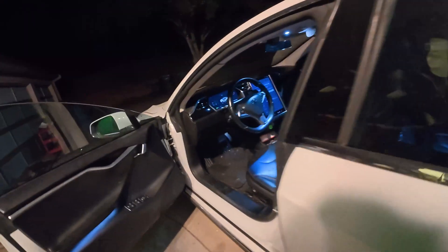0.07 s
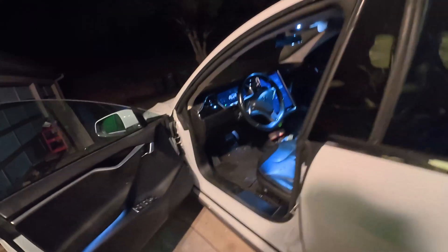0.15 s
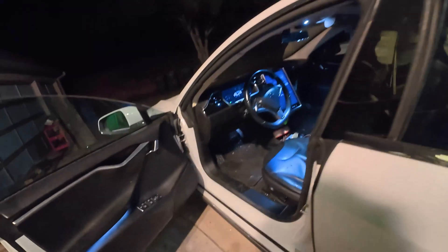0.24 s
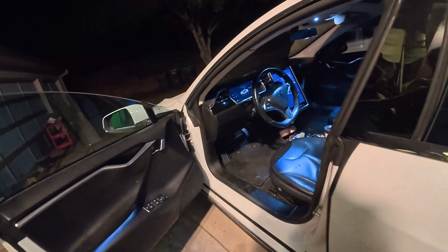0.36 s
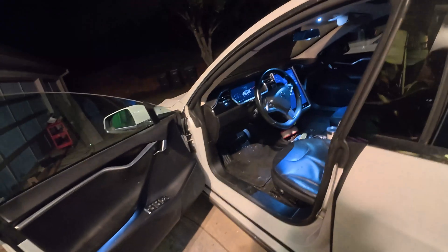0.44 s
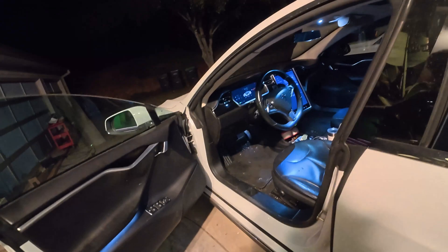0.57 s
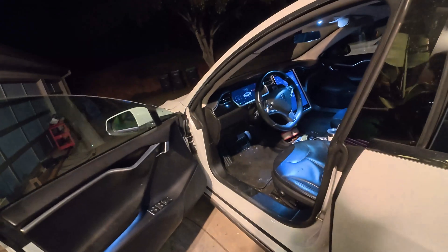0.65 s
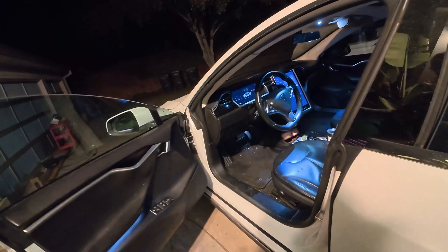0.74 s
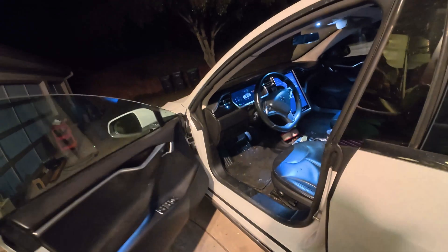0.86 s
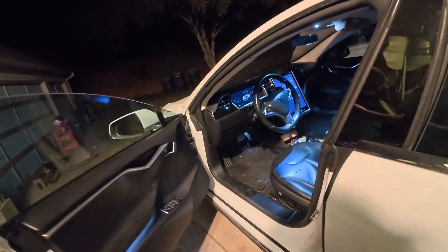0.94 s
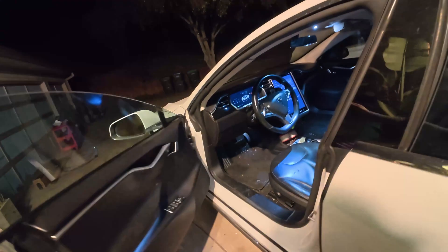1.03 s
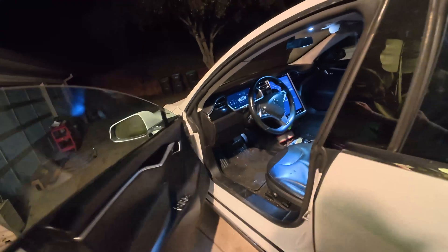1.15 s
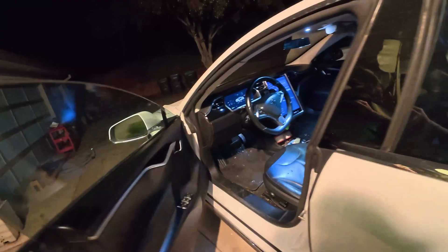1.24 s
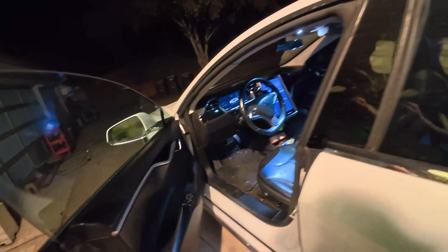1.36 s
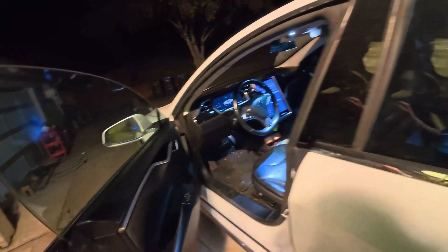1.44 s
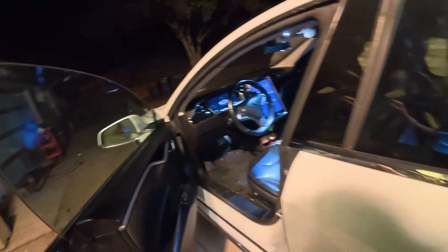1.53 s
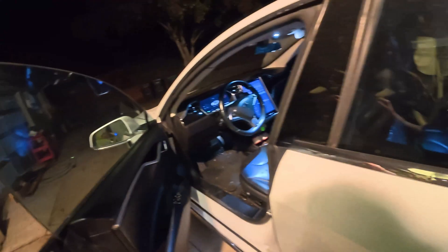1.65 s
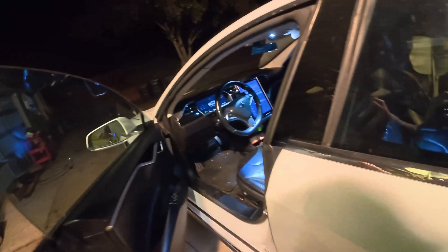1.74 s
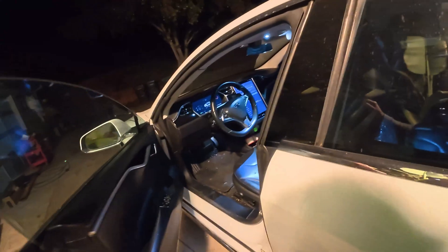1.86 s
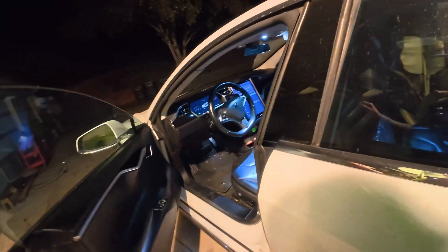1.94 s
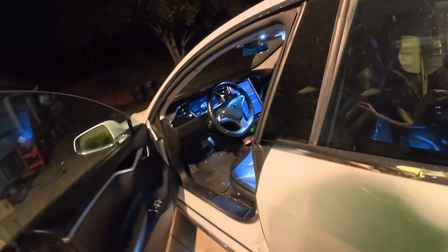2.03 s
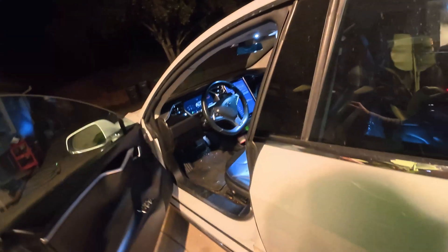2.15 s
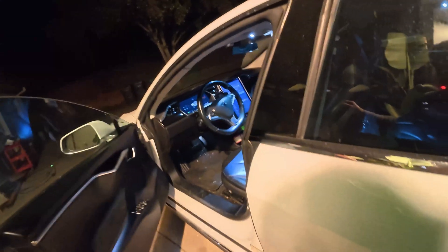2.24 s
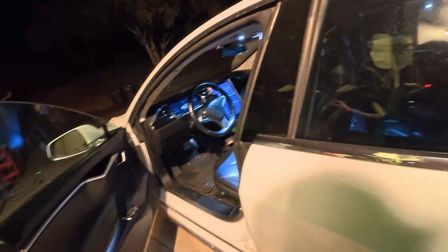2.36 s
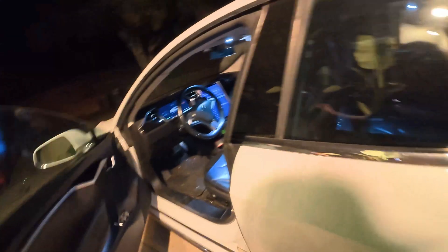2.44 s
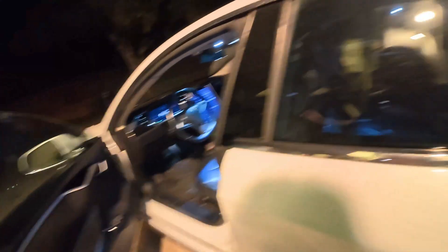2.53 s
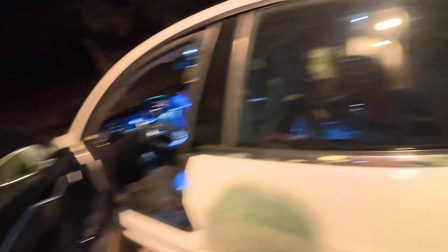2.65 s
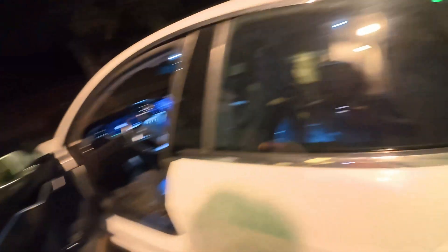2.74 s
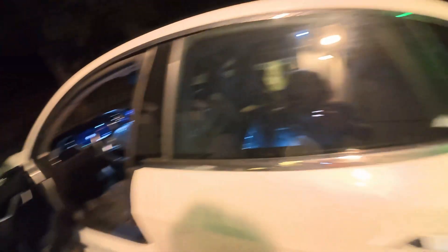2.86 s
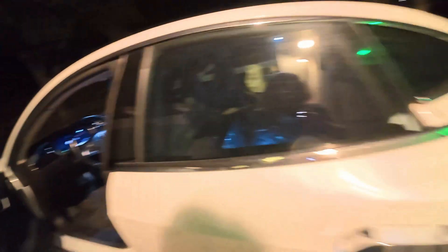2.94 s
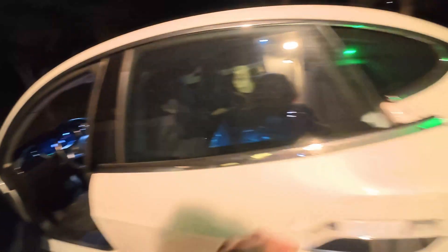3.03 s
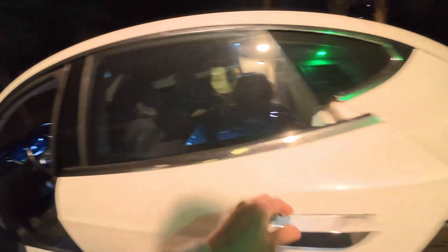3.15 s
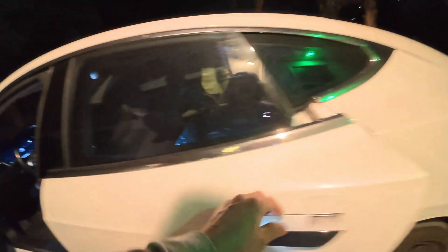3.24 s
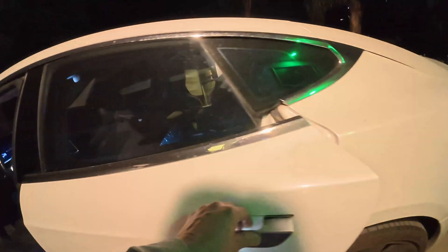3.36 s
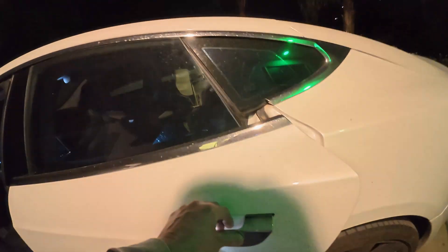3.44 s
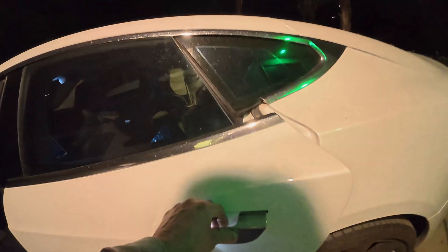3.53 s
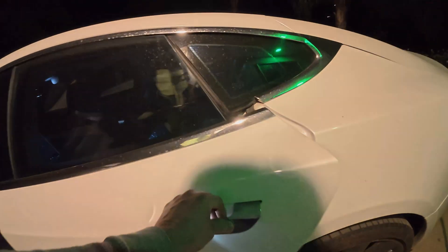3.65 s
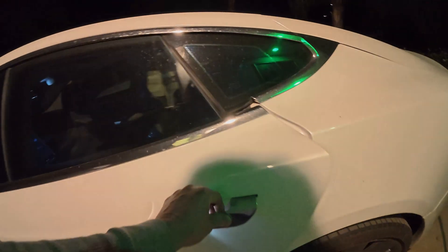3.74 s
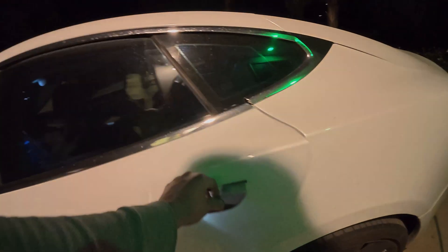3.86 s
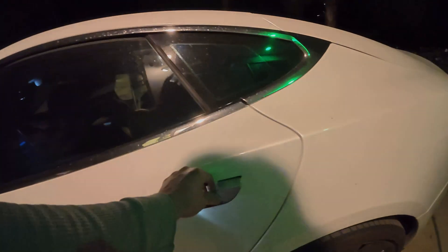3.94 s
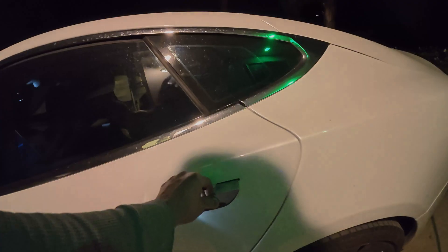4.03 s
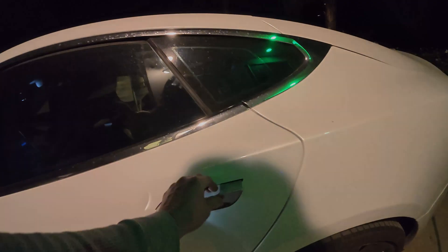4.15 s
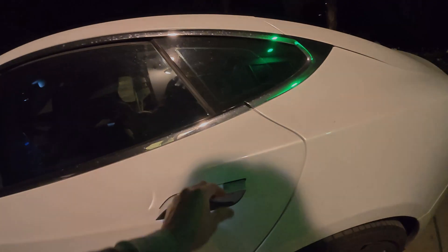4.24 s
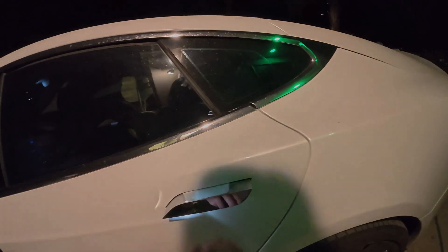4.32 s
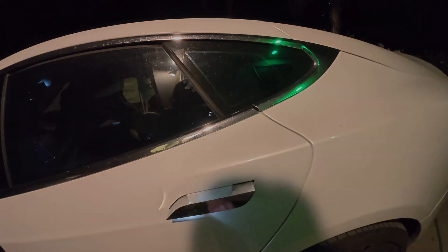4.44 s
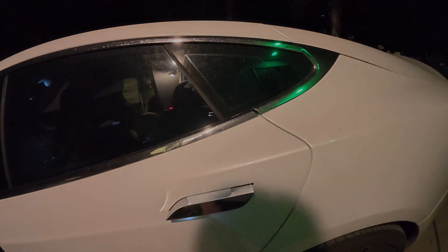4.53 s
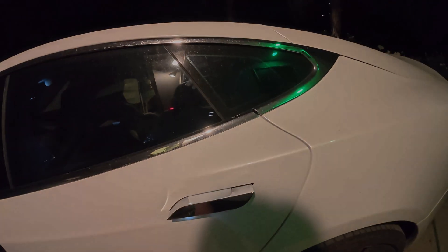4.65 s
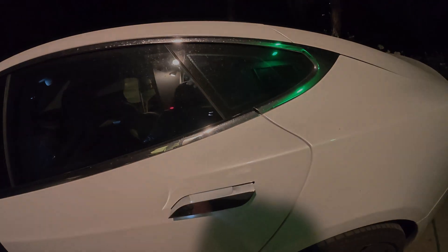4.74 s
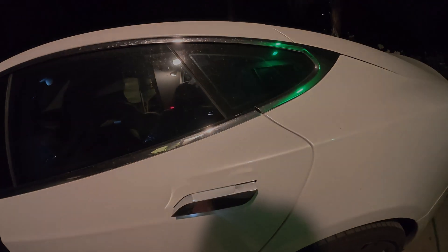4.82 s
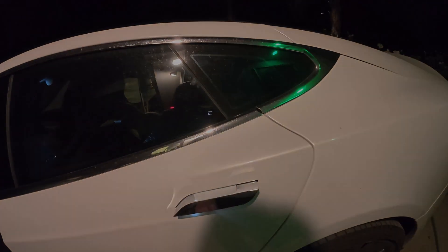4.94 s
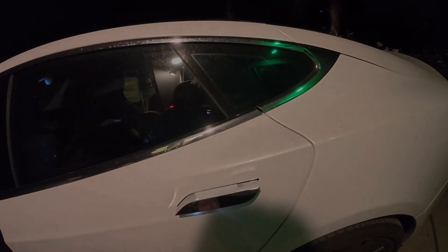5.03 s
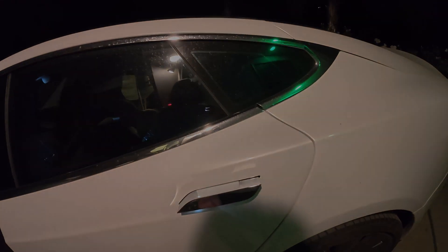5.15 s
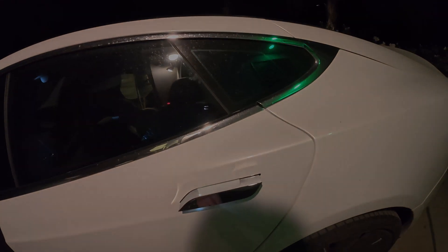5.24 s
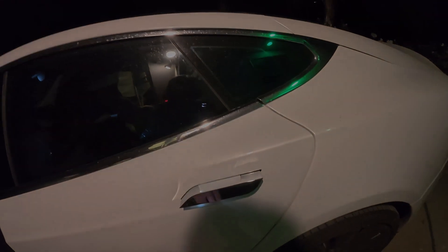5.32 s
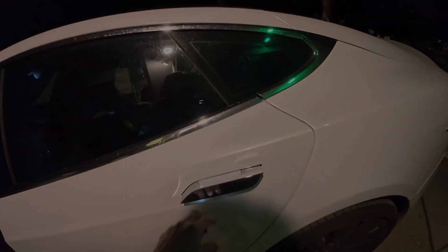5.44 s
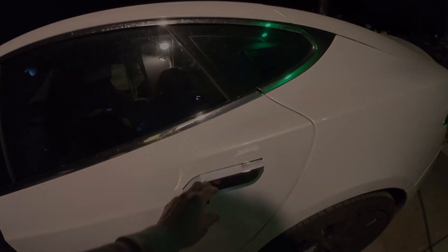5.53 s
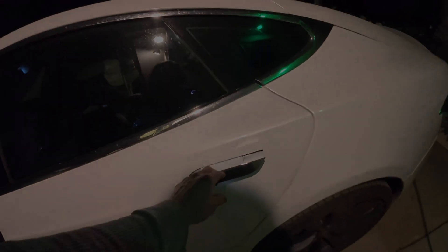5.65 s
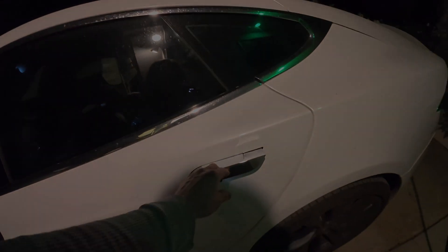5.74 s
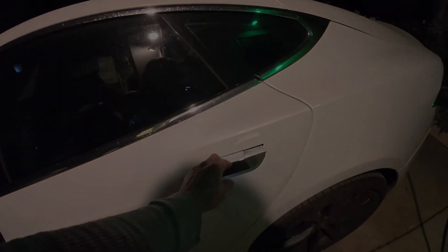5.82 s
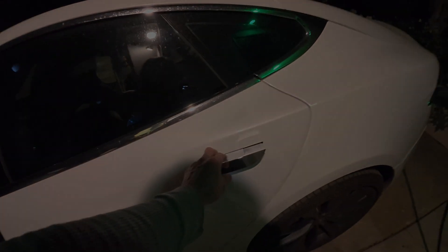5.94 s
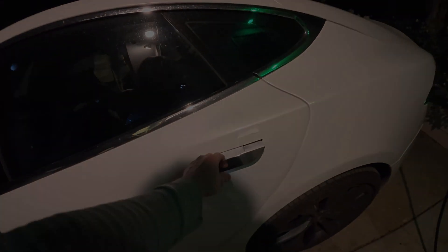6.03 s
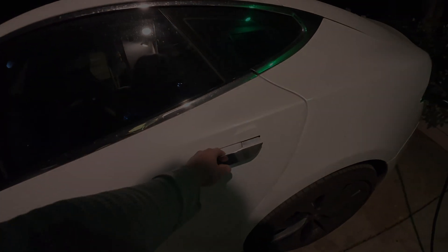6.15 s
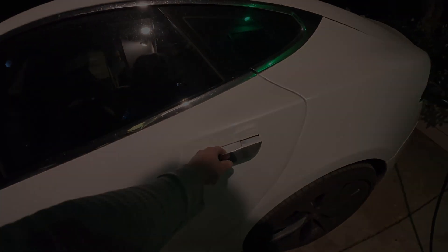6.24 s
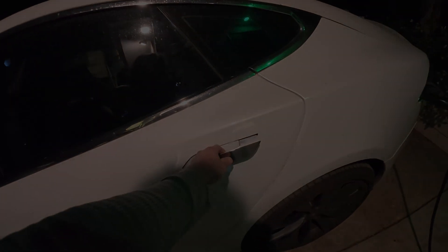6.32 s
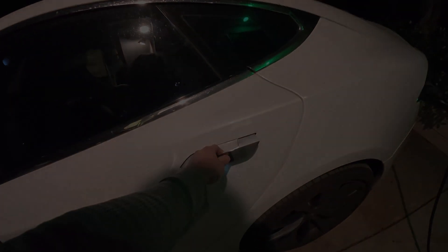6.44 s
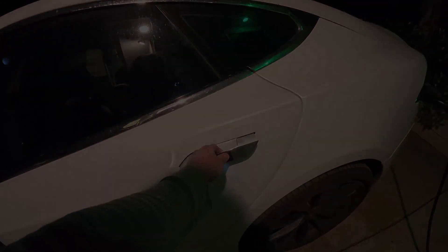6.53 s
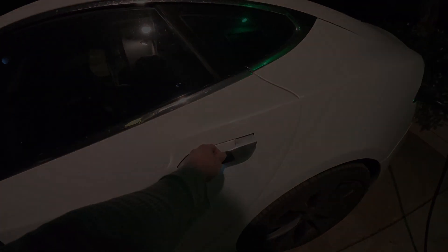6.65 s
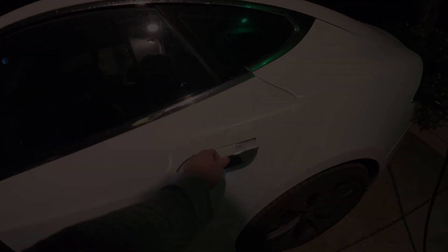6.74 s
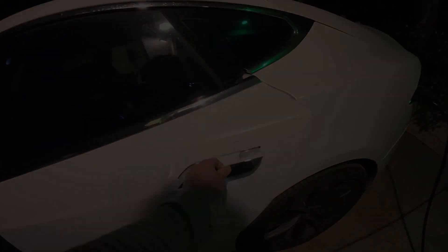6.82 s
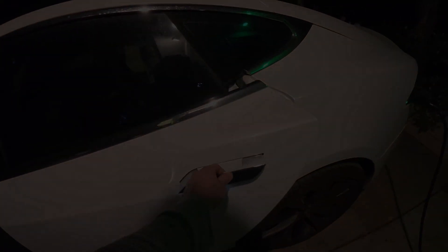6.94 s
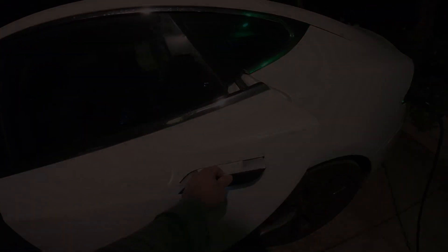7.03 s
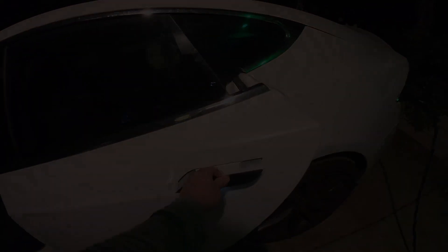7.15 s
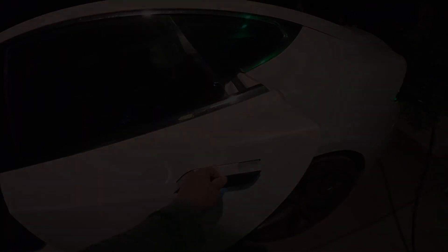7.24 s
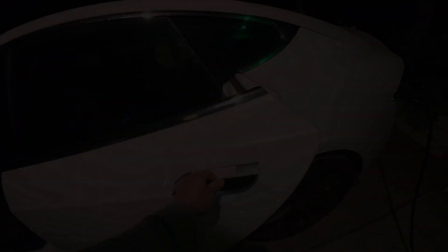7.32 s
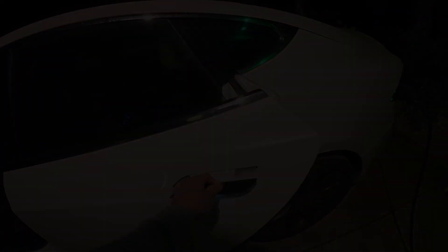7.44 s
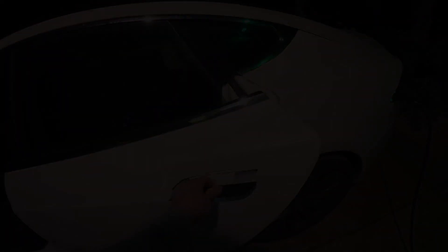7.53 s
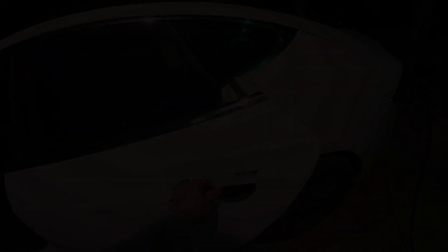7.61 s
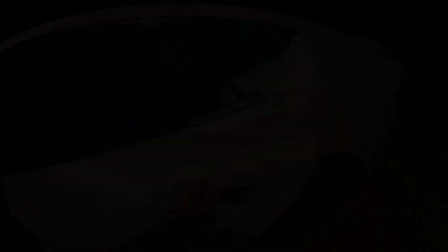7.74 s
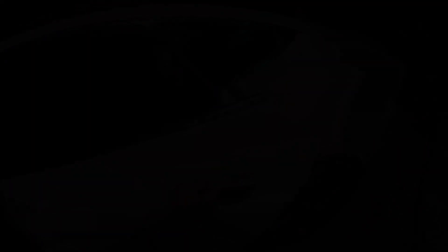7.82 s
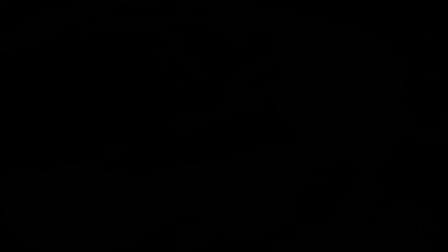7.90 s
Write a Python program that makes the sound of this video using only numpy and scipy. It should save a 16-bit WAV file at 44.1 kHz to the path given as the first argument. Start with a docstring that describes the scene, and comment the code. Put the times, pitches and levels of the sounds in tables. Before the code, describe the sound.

Close stereo pickup in an open yard with low distant traffic. Cloth swishes, hard footfalls and gritty scrapes lead to one dominant door slam, with ringing panel and low air thump. A short rubbing window movement and soft settling knocks follow. After a quiet pause come a bright tick, faint two-tone hum, small plastic taps, a squeak, the window sliding down and a whirring latch release, fading to silence.

```python
"""A parked car's rear door is pushed shut at night: its latch cracks, its skin rings, the cabin air booms.
The frameless window slides up into its seal by toothed friction; later it drops, the latch lets go and the
seal peels. Someone in a rustling jacket (creasing noise) steps along a paved driveway, with short knocks,
snapping grit and scraping soles. Far traffic rumbles as shaped noise, a two-tone hum starts up in the car,
walls and paving answer faintly, and the whole sound fades away over its last seconds."""
import sys
import numpy as np
from scipy import signal
from scipy.fft import rfft, irfft, next_fast_len
from scipy.io import wavfile
from scipy.ndimage import uniform_filter1d, map_coordinates

SR = 44100
rng = np.random.default_rng(int(sys.argv[2]) if len(sys.argv) > 2 else 0)


def bounce(signal):
    """Save signal as a 16-bit WAV file at the path given by the first command-line argument."""
    frames = np.transpose(np.atleast_2d(signal))
    limited = np.clip(frames, -1, 1)
    pcm = np.round(limited * 32767).astype(np.int16)
    wavfile.write(sys.argv[1], SR, pcm)


N = 351918

# Resonances of the door skin. Each row: frequency in Hz, relative level in dB, t60 in seconds.
DOOR_SKIN = [(173, -23, 0.26), (193, -19, 0.19), (240, -18.5, 0.22), (321, 1.5, 0.052), (348, -17, 0.12),
             (420, -23, 0.069), (517.5, -12, 0.13), (591, -15, .11), (740, -21, 0.1), (1013, -23.5, 0.12),
             (1070, -21, .11), (1146, -15, 0.12), (1175.8, -14, 0.09), (1217, -5, 0.065), (1281, -20, .14),
             (1780, -18.5, 0.058), (1831, -19.5, 0.14)]
# Window motor strokes: the glass travels, then squeezes into its seal.
# Each row: start in seconds, rise in seconds, length in seconds, relative level in dB, run-down t60 in seconds.
WINDOW_UP = [(4.432, 0.014, 0.251, -54.5, 0.17), (4.485, .04, .13, -44, 0.13)]
# The glass travels down, then drags out of its seal. Each row: the same columns as WINDOW_UP.
WINDOW_DOWN = [(6.52, 0.036, 0.23, -48, 0.14), (6.61, 0.017, 0.08, -30, 0.11)]


def amp(db):
    """Decibels to gain."""
    return 10 ** (np.asarray(db) / 20)


def unit(x):
    """x scaled to rms 1."""
    return x / np.sqrt(np.mean(x ** 2) + 1e-20)


def along(points, hz):
    """(Hz, value) points read on a log frequency axis."""
    f, v = np.transpose(points)
    return np.interp(np.log(hz + 1), np.log(f + 1), v)


def wobble(rate):
    """A smooth random curve, rate knots a second."""
    knots = rng.standard_normal(int(N * rate / SR) + 4)
    return map_coordinates(knots, [np.arange(N) * rate / SR])


def filtered(x, response):
    """x times a response of frequency."""
    size = x.shape[-1]
    m = next_fast_len(size + SR // 4)
    return irfft(rfft(x, m) * response(np.fft.rfftfreq(m, 1 / SR)), m)[..., :size]


def causal(gain, size=2048):
    """The impulse response with this gain over frequency that starts at once (minimum phase)."""
    cepstrum = irfft(np.log(np.maximum(gain(np.fft.rfftfreq(size, 1 / SR)), 1e-6)))
    cepstrum[1:size // 2] *= 2
    cepstrum[size // 2 + 1:] = 0
    return irfft(np.exp(rfft(cepstrum)))


def add(track, s, sound):
    """Mix a sound into the track from time s on."""
    part = track[max(round(s * SR), 0):][:len(sound)]
    part += sound[:len(part)]


def fade(t, t60):
    """Free decay, 60 dB in t60."""
    return np.exp(-np.log(1000) * t / t60)


def resonant(peaks, hz):
    """Gain of (Hz, width in Hz, dB) resonances standing on a flat response."""
    return amp(sum(db / (1 + (2 * (hz - centre) / width) ** 2) for centre, width, db in peaks))


def grains(size, rate, spread_db):
    """Friction: noise broken into tiny slips of random strength, rate slips a second."""
    slip = np.cumsum(rng.random(size) < rate / SR)
    strength_db = spread_db * np.clip(rng.standard_normal(slip[-1] + 1), -2, 2)
    return unit(rng.standard_normal(size) * amp(strength_db)[slip])


def patchy(x, depth_db, size):
    """Narrow bands of x swell and sink at random; size is the analysis length in samples."""
    z = signal.stft(x, nperseg=size)[2]
    across_bands = uniform_filter1d(rng.standard_normal(z.shape), size=2, axis=0)
    patches = unit(uniform_filter1d(across_bands, size=6, axis=1))
    return signal.istft(z * amp(depth_db * np.clip(patches, -2, 2)), nperseg=size)[1][:N]


def impact(colour, edge_hz, t60, snap, peaks=()):
    """A first snap and a dense dying clatter; soft contacts have a low edge. Rms 1 over the first 10 ms."""
    t = np.arange(SR // 4) / SR
    clatter = rng.standard_normal(len(t)) * fade(t, t60)
    clatter /= np.linalg.norm(clatter)
    clatter[0] += snap
    gain = lambda hz: amp(along(colour, hz)) * resonant(peaks, hz) / np.sqrt(1 + (hz / edge_hz) ** 8)
    sound = signal.fftconvolve(clatter, causal(gain))
    return sound / np.sqrt(np.mean(sound[:SR // 100] ** 2))


def knocks(rows, colour, snap, peaks=()):
    """Contacts on one material, each an impact with its own level, edge and decay."""
    out = np.zeros(N)
    for s, db, edge_hz, t60 in rows:
        add(out, s, amp(db) * impact(colour, edge_hz, t60, snap, peaks))
    return out


def bounced(x):
    """Close reflections from the ground and the car's side comb the sound; its power stays the same."""
    # Each row: delay in seconds, level in dB relative to the direct sound.
    reflections = [(.0031, -13.5), (.0053, -13), (.0088, -13.5), (0.013, -18)]
    out = x.copy()
    for delay, db in reflections:
        add(out, delay, amp(db) * x)
    return unit(out) * np.sqrt(np.mean(x ** 2))


def strokes(rows):
    """Gain per sample of a motor: each stroke builds up, holds and runs down."""
    t = np.arange(N) / SR
    gain = np.zeros(N)
    for s, rise, length, db, t60 in rows:
        run_down = fade(np.maximum(t - s - length, 0), t60)
        gain += amp(db) * np.clip((t - s) / rise, 0, 1) * run_down
    return gain


def slide(stroke, colour, spread_db, tooth_hz, throb, ring_db, shift_db=3.5):
    """A geared motor drags glass or latch along rubber; its teeth pulse the friction, which rings the door."""
    unsteady_hz = tooth_hz * (1 + .04 * wobble(15))
    teeth = 1 + throb * np.sin(2 * np.pi * np.cumsum(unsteady_hz) / SR)
    # the moving contact keeps exciting different resonances
    friction = patchy(teeth * grains(N, rate=640, spread_db=spread_db), shift_db, size=768)
    skin = [(hz, 4 / t60, ring_db) for hz, _, t60 in DOOR_SKIN]
    rubbed = filtered(friction, lambda hz: amp(along(colour, hz)) * resonant(skin, hz))
    return unit(rubbed) * strokes(stroke)


def traffic(level_db=-43.5, swell_db=1, patchy_db=3.5):
    """Steady far traffic: low-heavy noise whose bands swell and sink in drifting patches."""
    # Spectrum of the far road. Each row: frequency in Hz, gain in dB.
    road_colour = [(12, -35), (20, 0.5), (65, 3), (92, -1), (113, -1), (157, -11.5), (262, -12.5),
                   (373, -18.5), (426, -23.5), (793, -27.5), (1440, -42.5), (2870, -51.5), (4000, -51),
                   (5200, -70.5), (8800, -120)]
    noise = patchy(rng.standard_normal(N), patchy_db, size=2048)
    road = unit(filtered(noise, lambda hz: amp(along(road_colour, hz))))
    return road * amp(level_db + swell_db * wobble(6.4))


def jacket(width=.3, flutter_db=1.9):
    """Cloth rubs on cloth in fine creases: a faint stir, and a swish at each swing of an arm or leg."""
    # Spectrum of rubbing cloth. Each row: frequency in Hz, gain in dB.
    cloth_colour = [(900, -29), (1600, -6), (2150, -3.5), (2900, -3), (4500, 3), (6800, -6.5), (9200, 2),
                    (10800, -12), (13000, -9), (16000, -24)]
    # Each row: peak time in seconds, half length in seconds, level in dB, frequency of the extra rub in Hz.
    swishes = [(.04, 0.13, -64, 8950), (.26, .05, -67, 8450), (.43, 0.044, -68, 9100),
               (0.622, 0.033, -65.5, 1950), (.83, 0.079, -64.5, 8460), (1.2, 0.079, -77, 9200),
               (1.52, 0.048, -72.5, 3250), (1.742, 0.061, -64, 3150), (2.06, 0.24, -68.5, 2144),
               (2.49, 0.091, -64.5, 4200), (2.97, 0.31, -68, 12000), (3.26, 0.14, -67, 4530),
               (3.41, 0.041, -57, 9000), (3.77, 0.081, -67.5, 5500), (5.94, 0.064, -66.5, 5100),
               (6.42, 0.098, -71, 8110)]
    stir_db, stir_fall_db_per_s = -78, 0.23  # it calms as the walker comes to rest
    rub_db, rub_width = 10.5, .18  # height of the extra rub, and its width over its frequency

    def rub(size, peaks=()):
        """Left and right cloth noise, partly alike."""
        colour = lambda hz: amp(along(cloth_colour, hz)) * resonant(peaks, hz)
        mid, side = (unit(filtered(grains(size, rate=400, spread_db=2), colour)) for _ in range(2))
        return np.array([mid + width * side, mid - width * side])

    out = rub(N) * amp(stir_db - stir_fall_db_per_s * np.arange(N) / SR)
    lag = np.arange(SR) / SR - .5
    for s, half_length, db, hz in swishes:
        swell = amp(db) * np.exp(-(lag / half_length) ** 2)
        for track, cloth in zip(out, rub(SR, [(hz, rub_width * hz, rub_db)])):
            # a swish that would begin before time zero loses its start
            add(track, s - .5, (swell * cloth)[s + lag >= 0])
    return out * amp(flutter_db * wobble(18))


def grit():
    """Grit snaps under the soles: short, bright contacts on stone."""
    # Each row: start in seconds, level in dB, upper edge in Hz, t60 in seconds.
    snaps = [(.125, -56.5, 9600, 0.0037), (.724, -60, 6670, 0.014), (.787, -59, 6550, 0.0082),
             (1.187, -65, 14040, 0.031), (2.407, -37, 5470, .022), (2.506, -55.5, 11970, 0.02),
             (3.043, -54, 14000, 0.088), (3.134, -52.5, 12000, 0.017), (3.161, -56, 12100, 0.012),
             (3.375, -51.5, 12000, .03), (3.710, -30.5, 7810, .022)]
    # Spectrum of snapping stone. Each row: frequency in Hz, gain in dB.
    stone_colour = [(300, -28.5), (1400, -24.5), (2500, -14.5), (3600, -5.5), (5600, -6), (8800, -5),
                    (11000, -12.5), (16000, -27.5)]
    return knocks(snaps, stone_colour, snap=.6)


def squeaks(waver=0.0225):
    """Brief rubbery stick-slip tones of unsteady pitch."""
    # Each row: peak time in seconds, half length in seconds, mean frequency in Hz, peak level in dB.
    tones = [(0.336, 0.0044, 1106, -54.5), (3.43, 0.0068, 1990, -54.5), (3.437, 0.0054, 2090, -50.5),
             (6.151, 0.0086, 2220, -51), (6.152, 0.011, 1080, -56), (6.182, .014, 2240, -63)]
    t = np.arange(N) / SR
    drift = np.cumsum(1 + waver * wobble(250)) / SR
    out = np.zeros(N)
    for s, length, hz, db in tones:
        out += amp(db) * np.exp(-((t - s) / length) ** 2) * np.sin(2 * np.pi * hz * drift)
    return out


def scuffs_and_tick():
    """Soles drag over gritty stone in swells of tiny slips; the row at 5.762 s is one short bright tick."""
    # Each row: peak time in seconds, rise in seconds, fall in seconds, level in dB, lower edge in Hz,
    # bite just above the edge in dB (negative dulls it).
    swells = [(0.628, 0.014, 0.043, -63, 2200, -6), (2.16, .02, 0.028, -41, 3800, 13),
              (2.374, 0.014, 0.017, -34.5, 1110, 4), (2.438, 0.023, 0.051, -58, 2010, -8.5),
              (2.608, .012, 0.017, -43.5, 2720, 6.5), (3.435, 0.027, 0.014, -56, 1400, 5),
              (3.662, 0.0087, 0.039, -42, 1140, 2.5), (5.762, .001, 0.0047, -41, 5720, 9.5)]
    # Spectrum of a scraping sole, which colours the tick too. Each row: frequency in Hz, gain in dB.
    sole_colour = [(400, 2), (1500, 2.5), (2700, -2), (4000, -7.5), (5500, -6.5), (7000, -13.5), (9000, -5),
                   (11000, -17.5), (13500, -19), (16000, -29.5)]
    out, t = np.zeros(N), np.arange(SR // 2) / SR
    for s, rise, fall, db, edge_hz, bite_db in swells:
        lag = t - 2 * rise
        swell = np.where(lag < 0, np.exp(-(lag / rise) ** 2), np.exp(-np.abs(lag / fall) ** 4.6))
        bite = [(1.6 * edge_hz, 4.1 * edge_hz, bite_db)]
        low_cut = lambda hz: 1 - 1 / (1 + (hz / edge_hz) ** 3)
        colour = lambda hz: amp(along(sole_colour, hz)) * resonant(bite, hz) * low_cut(hz)
        slips = unit(filtered(grains(len(t), rate=2000, spread_db=4.5), colour))
        add(out, s - 2 * rise, amp(db) * swell * slips)
    return out


def footsteps():
    """Heels and toes strike the pavers, and both bodies resonate."""
    # Each row: start in seconds, level in dB, upper edge in Hz, t60 in seconds.
    footfalls = [(1.528, -30, 980, .036), (1.9755, -37.5, 4000, .02), (1.978, -16, 10900, .04)]
    # Spectrum of a struck paver. Each row: frequency in Hz, gain in dB.
    paver_colour = [(100, -17), (280, 0.5), (420, 0), (750, 2.5), (1000, -3), (1300, -3), (2000, -2),
                    (2850, -10), (3600, -14), (5000, -13), (7000, -25), (9300, -18.5), (11000, -38),
                    (15000, -43.5)]
    # Heel and paver resonances. Each row: frequency in Hz, width in Hz, height in dB.
    heel_peaks = [(514, 41, 4.5), (680, 44, 0), (746.5, 40, 0), (853, 56, 5), (1230, 77, 1),
                  (1480, 71.7, 5), (2200, 120, 2), (2884, 220, 11.5)]
    return knocks(footfalls, paver_colour, snap=0.72, peaks=heel_peaks)


def thumps():
    """The panel and the enclosed air swing after a soft push, the longer the lower they are."""
    # Each row: start in seconds, level in dB, frequency in Hz.
    pushes = [(1.53, -36.5, 310), (1.785, -25.5, 31.3), (3.325, -31, 253.6), (3.964, -21, 176.7),
              (3.983, -16, 24), (3.984, -19.5, 99.64), (3.992, -7.5, 35.56), (4.484, -29.5, 135),
              (4.49, -34.5, 256), (4.52, -32, 42.5), (4.664, -21.5, 91), (4.672, -29, 230),
              (5.072, -38, 255.3), (6.495, -19.5, 52), (6.661, -23, 96), (6.674, -20, 40.3),
              (7.012, -20, 284), (7.1, -22, 288)]
    rise_s, base_t60_s = 0.0056, .12
    boom_hz, boom_t60_s = 30, 0.57  # at boom_hz a swing lasts this much longer
    out, t = np.zeros(N), np.arange(SR) / SR
    for s, db, hz in pushes:
        t60 = base_t60_s + boom_t60_s * (boom_hz / hz) ** 2
        swing = np.sin(2 * np.pi * hz * t) * fade(t, t60)
        add(out, s, -amp(db) * swing * (1 - np.exp(-t / rise_s)))
    return out


def door(scatter_db=1, attack=.0006):
    """Each contact cracks through the steel latch and rings the skin, whose loose trim roughens the ring."""
    # The hand lands (3.3 s), the latch first catches (3.9 s) and the door shuts (from 3.96 s); the window
    # starts up (4.4 s), stops and settles (4.7, 5.1 s), drops (from 6.5 s); the latch lets go (from 7 s).
    # Each row: start in seconds, ring level in dB, ring tilt in dB per octave, crack level in dB,
    # crack upper edge in Hz, crack t60 in seconds.
    blows = [(3.300, -44, -2, -38.5, 9800, 0.11), (3.322, -30.5, -9.5, -48, 4030, 0.047),
             (3.924, -28, .5, -30, 1290, 0.045), (3.934, -16.5, 3, -24, 1830, 0.038),
             (3.960, -6, 0, -17.5, 10000, 0.05), (3.985, -16.5, -13, -19.5, 10000, 0.064),
             (3.996, -30, -8, -34.5, 4530, .17), (4.443, -35, -6, -49, 2980, 0.09),
             (4.668, -30, -6, -47.5, 4250, .07), (5.070, -41.5, -10.5, -59.5, 6040, 0.094),
             (6.496, -34.5, -7, -59, 2440, .046), (6.549, -31, -5.5, -43, 6000, .082),
             (6.759, -24, -4, -36.5, 2180, 0.058), (7.001, -20, -1, -25.5, 5230, 0.061),
             (7.099, -26, -4.5, -43, 4000, 0.052)]
    # Spectrum of the crack. Each row: frequency in Hz, gain in dB.
    crack_colour = [(120, -13), (300, 1), (900, 1), (1900, -4), (3500, -8.5), (5500, -11), (7300, -17),
                    (9000, -9), (10800, -19.5), (13000, -18), (16000, -25)]
    # Steel latch resonances. Each row: frequency in Hz, width in Hz, height in dB.
    latch_peaks = [(1890, 20, 3.5), (2630, 22, 3), (2700, 93, 4), (3000, 190, 6.5), (3350, 110, 5),
                   (3600, 52, 7.5), (4635, 79, 4), (8860, 64, 7)]
    out, t = np.zeros(N), np.arange(SR // 2) / SR
    hz, mode_db, t60 = np.transpose(DOOR_SKIN)[:, :, None]
    for s, ring_db, tilt_db, crack_db, edge_hz, crack_t60 in blows:
        tilt = tilt_db * np.log2(hz / hz[3])  # pivots on the strongest mode
        strength = amp(mode_db + tilt + scatter_db * rng.standard_normal(hz.shape))
        # each mode's phase wanders at random
        drift = 1.3 * hz / SR * np.cumsum(rng.standard_normal((len(hz), len(t))), axis=1)
        phase = 2 * np.pi * (hz * t + rng.random(hz.shape)) + drift
        ring = strength * np.sin(phase) * fade(t, t60)
        add(out, s, amp(ring_db) * ring.sum(0) * (1 - np.exp(-t / attack)))
        add(out, s, amp(crack_db) * impact(crack_colour, edge_hz, crack_t60, snap=0.39, peaks=latch_peaks))
    return out


def window_closing():
    """The window motor drives the glass up, rubbing into its seal."""
    # Spectrum of the upward rub. Each row: frequency in Hz, gain in dB.
    up_colour = [(120, -37), (200, 3.5), (320, -5), (350, -16.5), (521, -9), (734, -9.5), (1600, -4.5),
                 (1750, -10.5), (3350, -14), (5550, -21.5), (9050, -22), (10300, -28.5), (11200, -72),
                 (15000, -63)]
    return slide(WINDOW_UP, up_colour, spread_db=2.0, tooth_hz=253.5, throb=0.28, ring_db=2)


def rumble(up_db=3, down_db=-1):
    """The moving glass shakes the door panel: low noise that follows the motor strokes."""
    # Spectrum of the panel's rumble. Each row: frequency in Hz, gain in dB.
    panel_colour = [(15, -23), (35, 0.5), (110, -0.5), (200, -11), (400, -14), (1000, -59.5)]
    shake = unit(filtered(rng.standard_normal(N), lambda hz: amp(along(panel_colour, hz))))
    return shake * (amp(up_db) * strokes(WINDOW_UP) + amp(down_db) * strokes(WINDOW_DOWN))


def car_hum(lower_hz=388, upper_hz=468, upper_db=-8):
    """A faint hum starts up in the parked car: two tones, each wandering in pitch and level."""
    on_s, rise_s, level_db = 5.7, 0.29, -54

    def tone(hz):
        """One unsteady sine."""
        phase = 2 * np.pi * np.cumsum(hz * (1 + .008 * wobble(40))) / SR
        return np.sin(phase) * amp(2 * wobble(12))

    hum = tone(lower_hz) + amp(upper_db) * tone(upper_hz)
    running = np.clip((np.arange(N) / SR - on_s) / rise_s, 0, 1)
    return amp(level_db) * running * hum


def handle():
    """Ticks from the plastic door handle and the sleeve brushing it."""
    # Each row: start in seconds, level in dB, upper edge in Hz, t60 in seconds.
    ticks = [(5.946, -55, 2000, 0.047), (6.2855, -39, 2040, 0.037), (6.453, -62, 9000, 0.017),
             (6.574, -52.5, 9000, .051)]
    # Spectrum of tapped plastic. Each row: frequency in Hz, gain in dB.
    plastic_colour = [(200, -7), (600, -1.5), (1200, -5.5), (1750, -3), (2300, -17), (9000, -9)]
    return knocks(ticks, plastic_colour, snap=0.72)


def window_opening():
    """The window motor drives the glass down, dragging it out of its seal."""
    # Spectrum of the downward rub. Each row: frequency in Hz, gain in dB.
    down_colour = [(120, -32), (200, 2.5), (485, -15.5), (748, -6.5), (929, -4), (1090, 2.5), (1600, -13),
                   (1780, -3), (2420, -14.5), (4470, -16.5), (5170, -23), (8880, -28), (10800, -38.5),
                   (13000, -38), (15000, -61.5)]
    return slide(WINDOW_DOWN, down_colour, spread_db=3.5, tooth_hz=239, throb=0.19, ring_db=-2.0)


def latch_release():
    """The latch drive whirs, then the door peels off its seal, both as toothed friction."""
    # Each row: start in seconds, rise in seconds, length in seconds, level in dB, run-down t60 in seconds.
    release_strokes = [(6.925, 0.015, 0.096, -30, 0.113), (7.075, 0.021, 0.027, -36.5, 0.19)]
    # Spectrum of the latch drive. Each row: frequency in Hz, gain in dB.
    drive_colour = [(120, -44), (200, -16), (383, 2), (485, -12), (849, 4.5), (946, -2.5), (1600, -3.5),
                    (1750, -4.5), (5070, -17.5), (9550, -22.5), (11200, -40.5), (12700, -29.5),
                    (15000, -51)]
    return slide(release_strokes, drive_colour, spread_db=-3, tooth_hz=346, throb=.3, ring_db=2.0)


def yard(x, width=.25):
    """Walls and paving answer faintly with a noise tail, the treble dying first."""
    # Decay of the open yard. Each row: frequency in Hz, t60 in seconds.
    yard_decay = [(150, 0.42), (1000, 0.22), (4000, 0.17), (12000, 0.13)]
    hz, t, z = signal.stft(rng.standard_normal((2, SR // 2)), SR, nperseg=256)
    envelope = fade(t, along(yard_decay, hz)[:, None]) * (1 - np.exp(-t / 0.002))
    tail = signal.istft(z * envelope, SR, nperseg=256)[1]
    mid, side = signal.fftconvolve(x[None], tail / np.linalg.norm(tail[0]), axes=1)[:, :N]
    return np.array([mid + width * side, mid - width * side])


def fade_out(length_s=4.12, power=0.94):
    """Gain per sample: full, then sliding almost evenly to silence at the end."""
    left_s = (N - np.arange(N)) / SR
    return np.minimum(left_s / length_s, 1) ** power


def scene():
    """Feet, a bright tick, door and window in the open air, over jacket, traffic and hum."""
    ground = footsteps() + bounced(grit() + scuffs_and_tick())
    sliding = window_closing() + window_opening() + latch_release()
    car = door() + bounced(handle() + sliding) + squeaks()
    echo = yard(amp(-12.5) * ground + amp(-16.5) * car)
    return ground + car + thumps() + rumble() + echo + jacket() + traffic() + car_hum()


def record(dry, ceiling=0.99):
    """Two close microphone ports hear the bass alike and the treble differently; peaks round off."""
    # Left over right at the ports. Each row: frequency in Hz, level difference in dB.
    port_level = [(200, 0), (1000, .4), (2000, -.3), (4400, -.5), (6500, -3), (8200, -9), (9600, -7),
                  (11500, 3), (15000, 4)]
    # Scattered sound, opposite in the two ports. Each row: frequency in Hz, level in dB.
    scatter_level = [(100, -31), (1000, -28), (2500, -22), (5000, -11), (9000, -10), (13000, -6)]
    half = np.array([[.5], [-.5]])
    lead_s, top_hz = 2e-5, 15900  # the left port hears first; nothing passes top_hz
    turn = lambda hz: np.exp(2j * np.pi * half * hz * lead_s)
    ports = filtered(dry, lambda hz: amp(half * along(port_level, hz)) * turn(hz))
    # hand and casing scatter short waves unequally into the two ports
    casing = rng.standard_normal(SR // 150)
    scattered = signal.fftconvolve(dry.mean(0), casing / np.linalg.norm(casing))[:N]
    ports = ports + 2 * half * filtered(scattered, lambda hz: amp(along(scatter_level, hz)))
    rounded = ports / (1 + np.abs(ports / ceiling) ** 6) ** (1 / 6)
    return filtered(rounded * fade_out(), lambda hz: hz < top_hz)


dry = scene()
out = record(dry)
bounce(out)
```